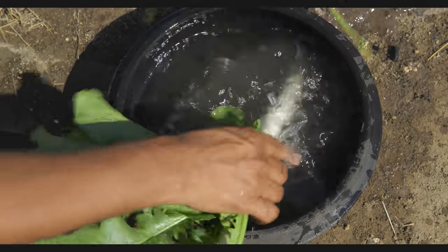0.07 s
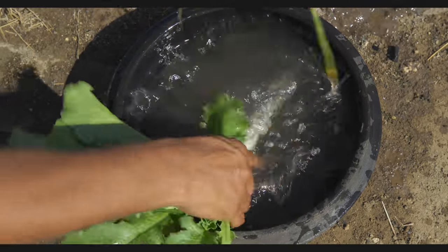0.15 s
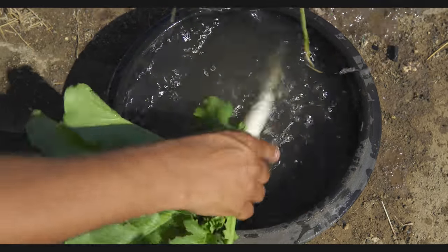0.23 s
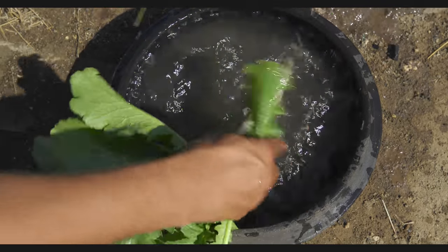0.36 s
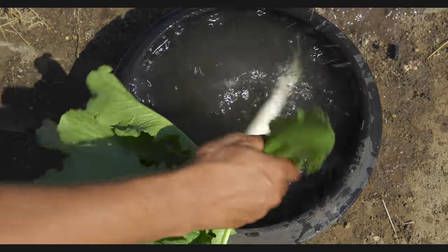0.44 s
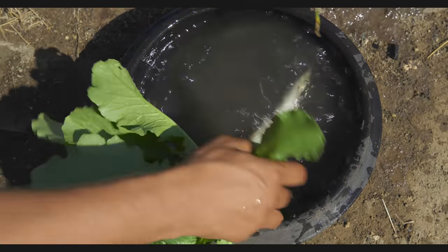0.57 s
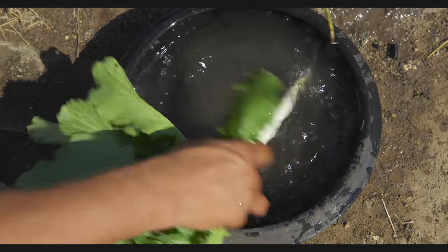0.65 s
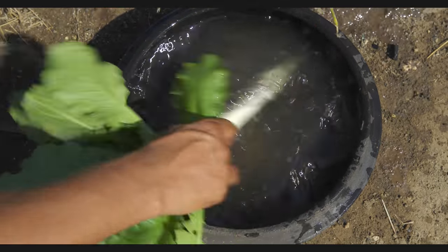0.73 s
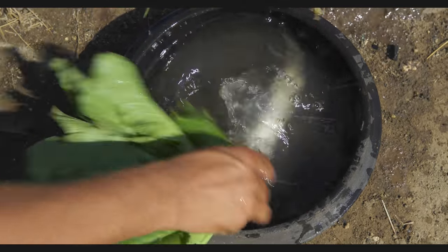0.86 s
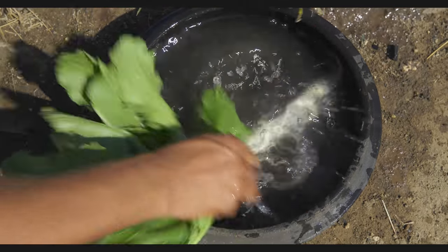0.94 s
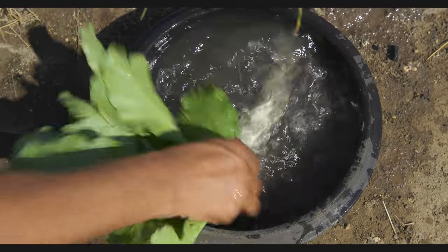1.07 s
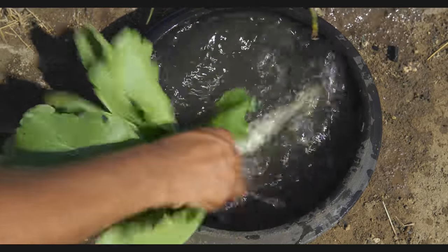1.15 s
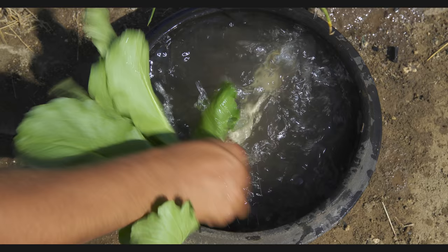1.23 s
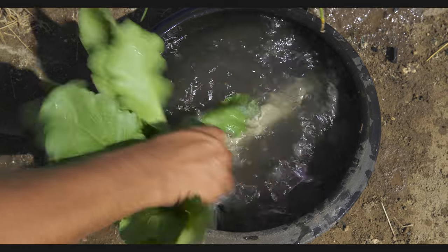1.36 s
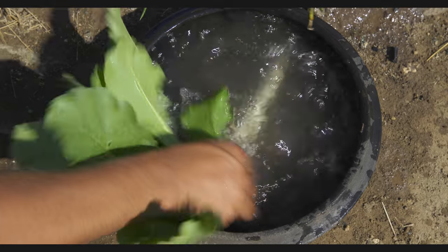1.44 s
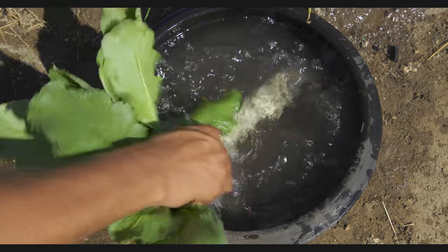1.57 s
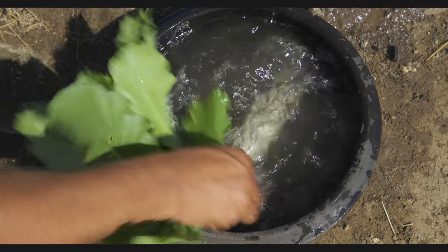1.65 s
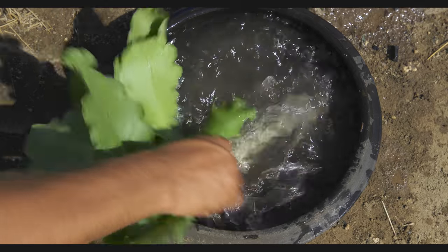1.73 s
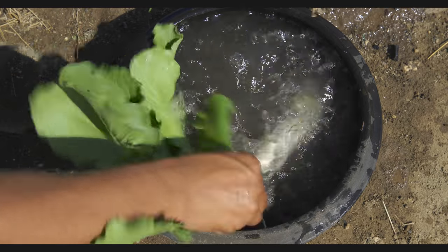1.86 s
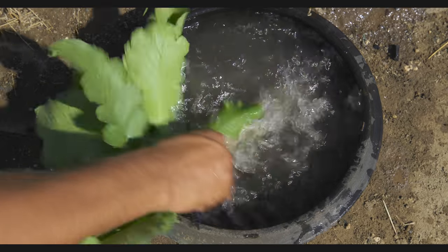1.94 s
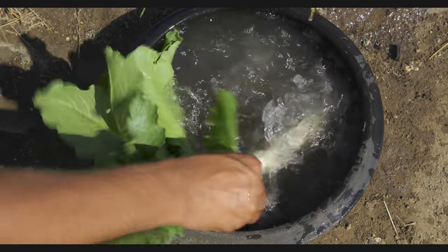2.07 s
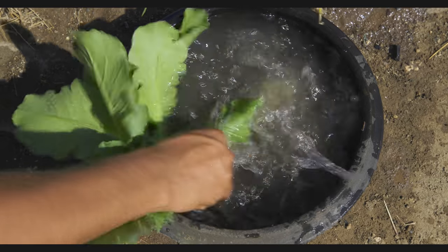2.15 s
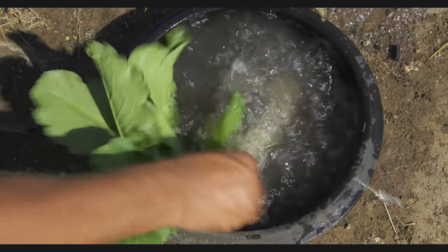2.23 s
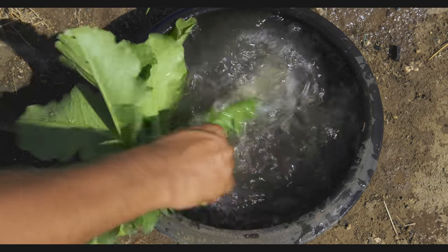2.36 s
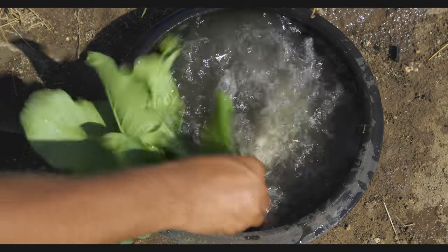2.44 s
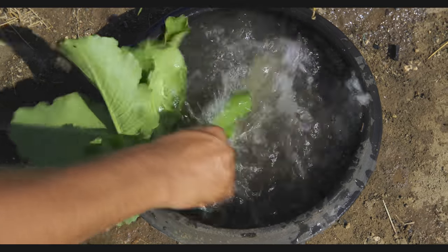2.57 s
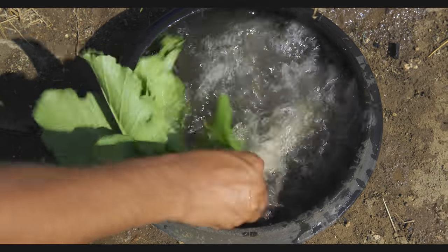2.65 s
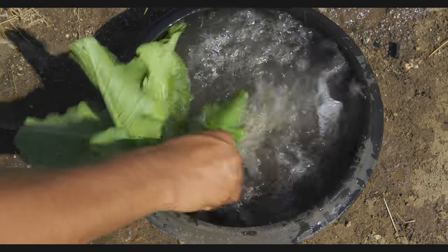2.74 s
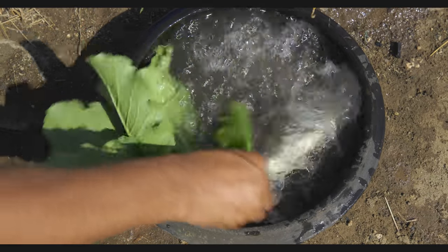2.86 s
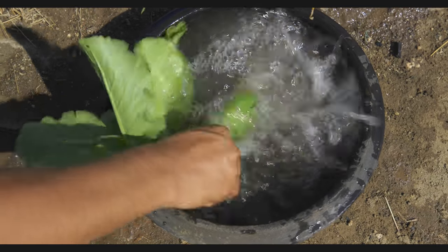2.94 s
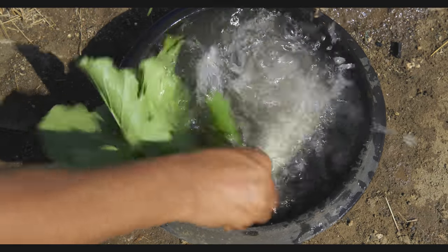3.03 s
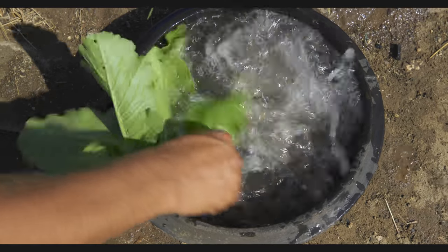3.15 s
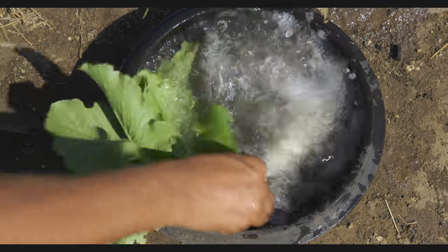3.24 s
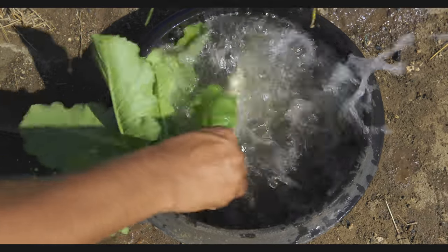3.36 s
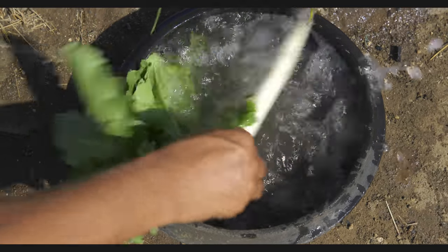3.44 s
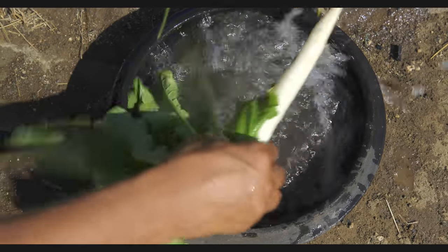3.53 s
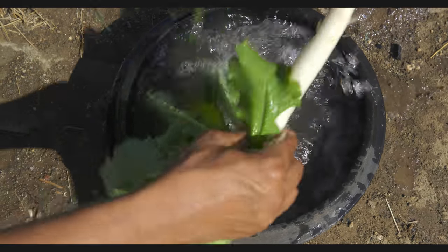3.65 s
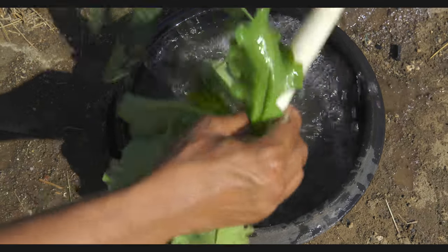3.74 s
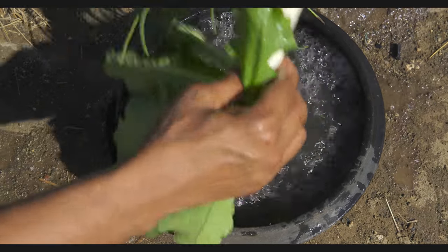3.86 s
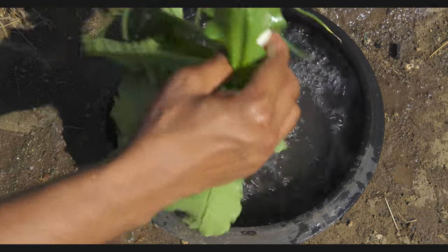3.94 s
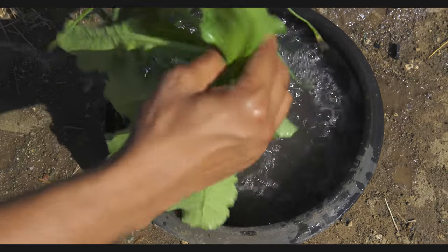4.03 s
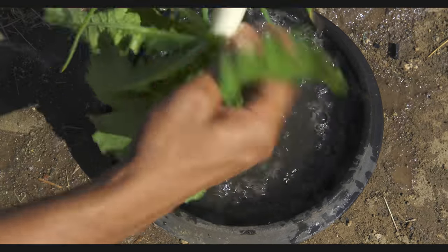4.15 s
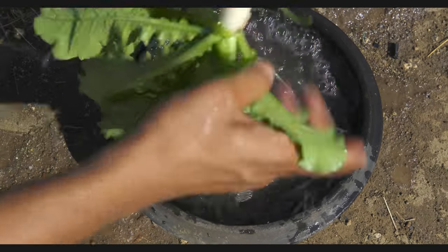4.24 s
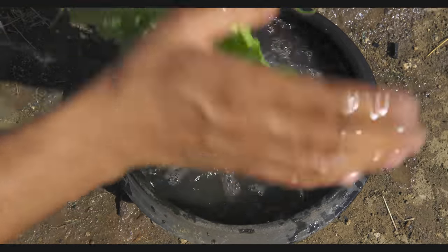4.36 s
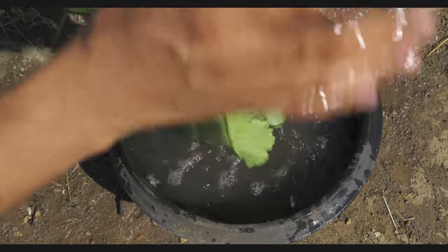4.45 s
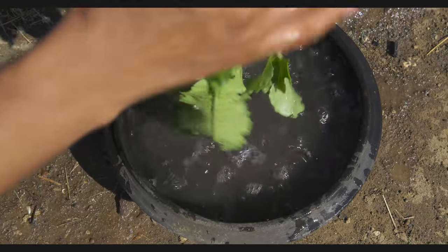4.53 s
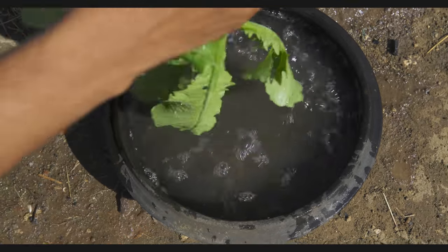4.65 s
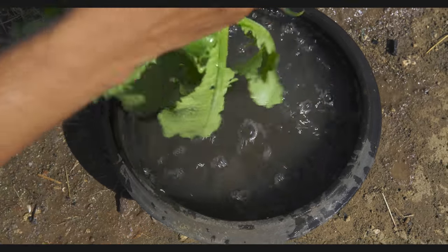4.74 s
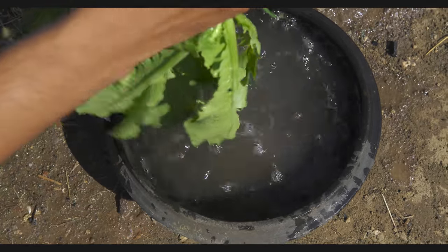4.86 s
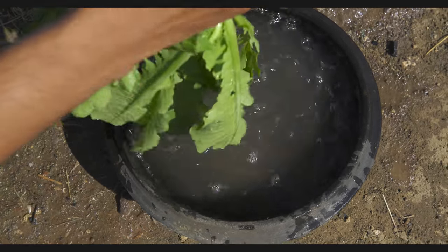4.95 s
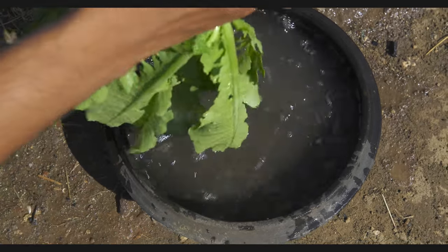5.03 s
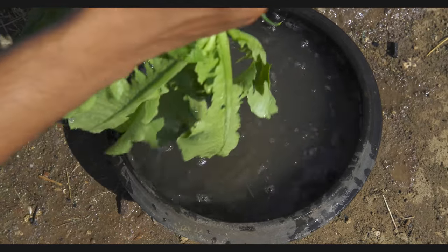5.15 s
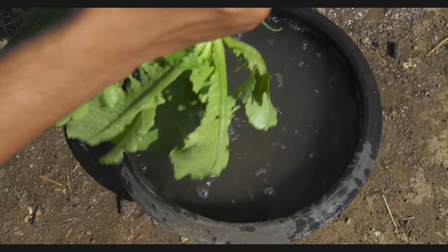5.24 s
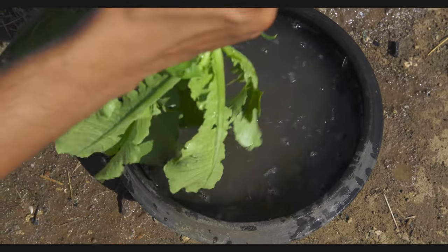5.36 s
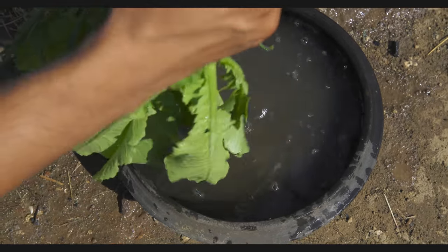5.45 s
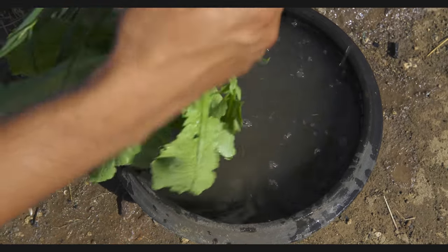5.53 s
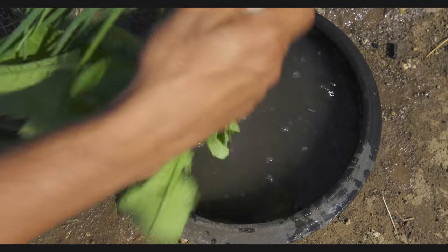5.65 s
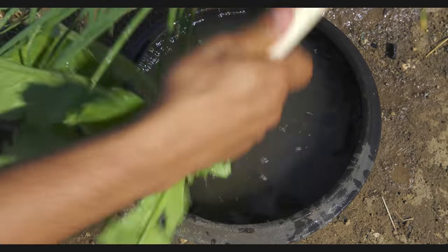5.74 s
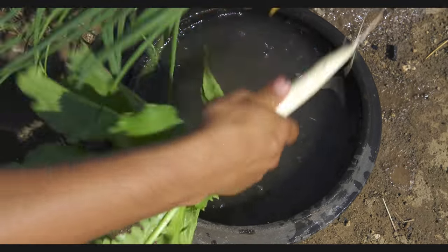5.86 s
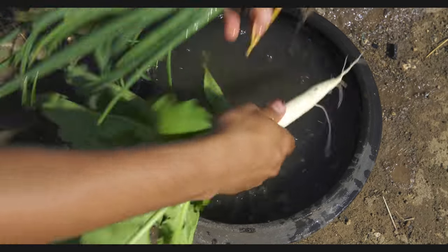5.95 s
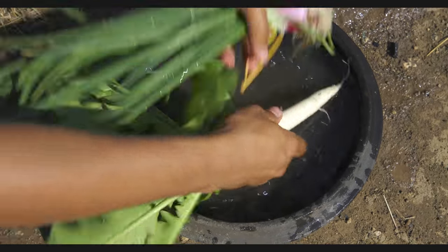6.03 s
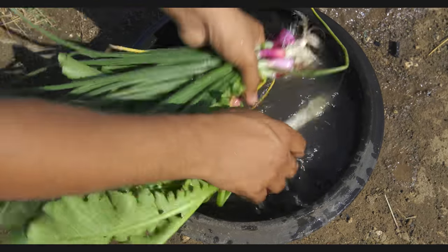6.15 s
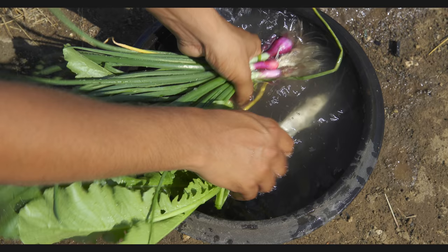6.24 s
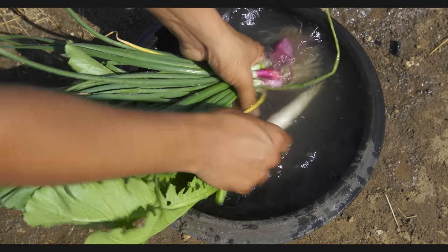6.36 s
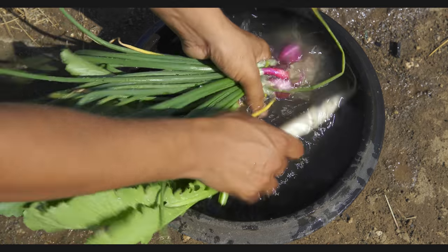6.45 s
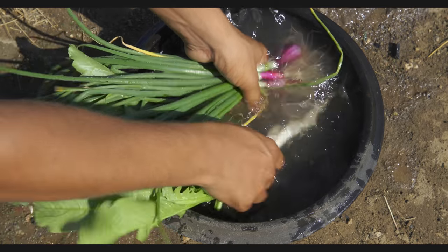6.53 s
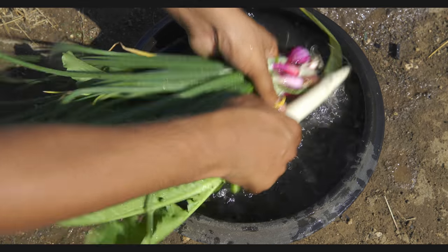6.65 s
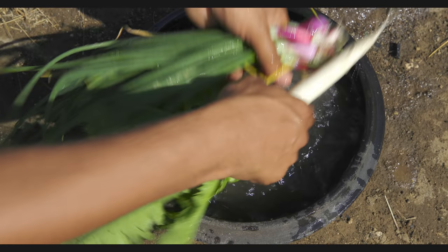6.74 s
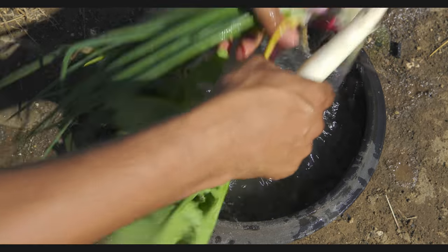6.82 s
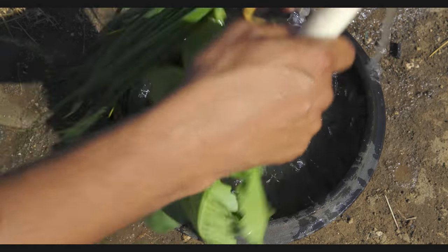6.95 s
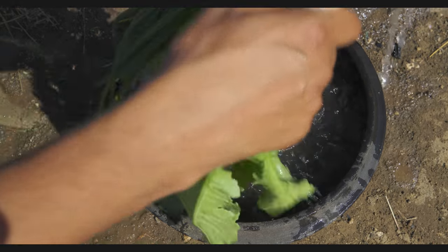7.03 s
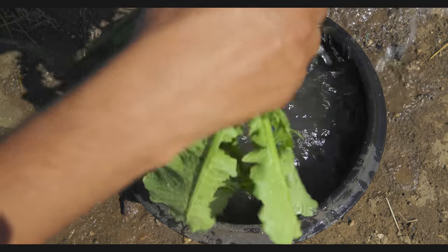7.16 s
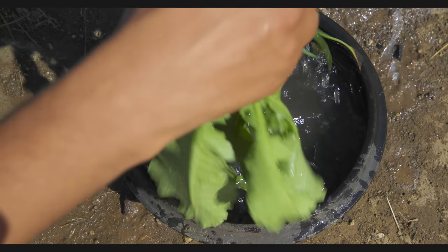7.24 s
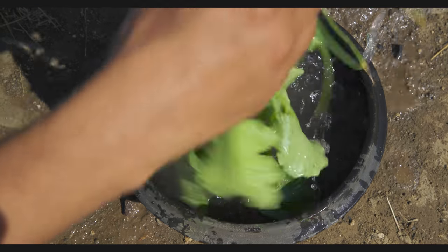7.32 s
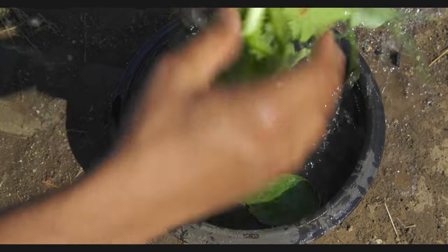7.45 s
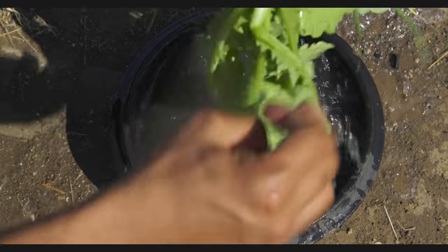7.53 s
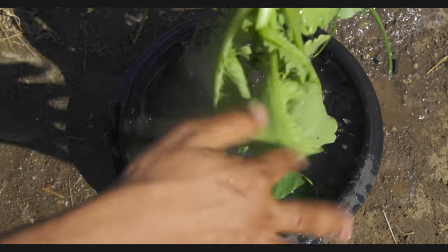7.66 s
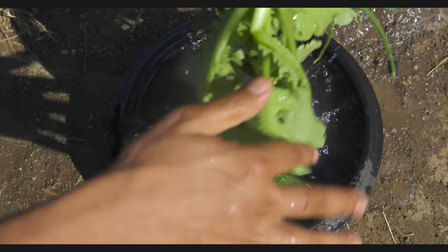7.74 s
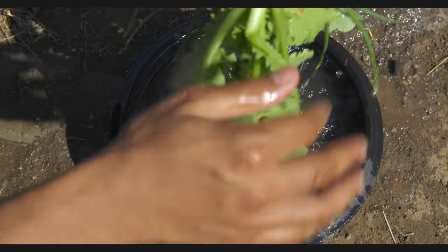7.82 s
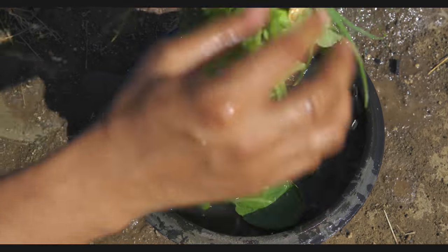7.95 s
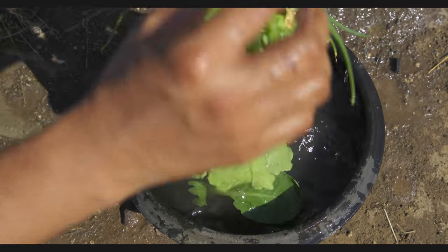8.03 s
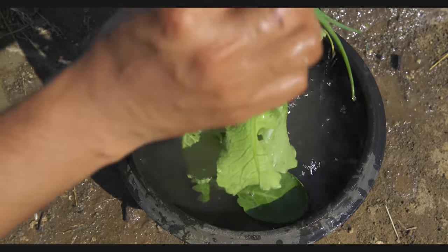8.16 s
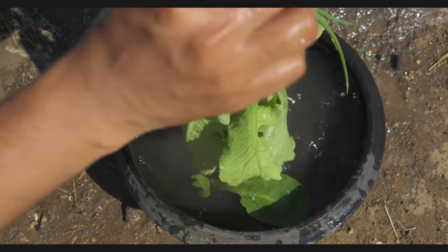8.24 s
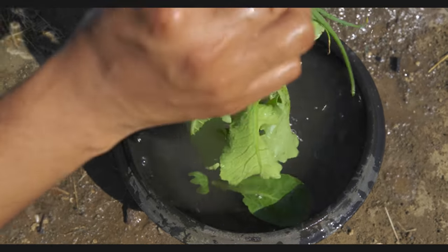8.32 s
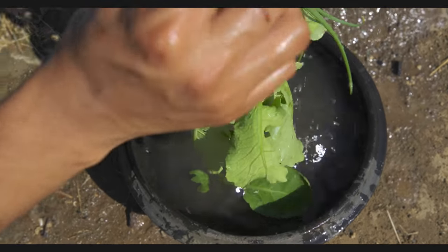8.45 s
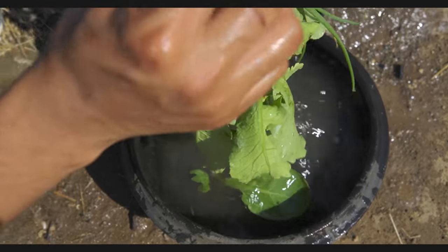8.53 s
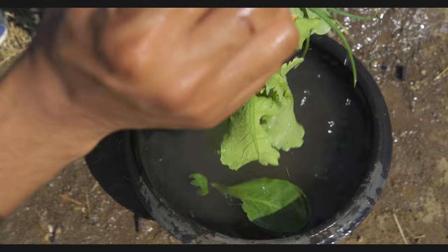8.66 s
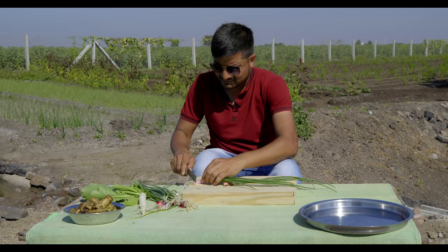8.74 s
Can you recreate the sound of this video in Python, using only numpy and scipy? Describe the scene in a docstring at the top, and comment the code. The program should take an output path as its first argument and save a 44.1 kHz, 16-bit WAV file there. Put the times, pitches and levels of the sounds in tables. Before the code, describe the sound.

Close, vigorous splashing and bubbly sloshing in a tub, a dripping pause with faint bird whistles, then lighter plinking dunks and drips.

```python
"""Washing vegetables in a tub

Radishes and spring onions are swished in a tub of water outdoors, lifted to drip, then dunked and lifted again.
Stirring folds air under: swarms of ringing bubbles over coloured noise gurgle, patter and crackle.
Larger bubbles and drops are single short tones; slaps and spits of spray are short bursts of noise.
A bird whistles far off in sliding tones, over the faint steady noise of the open field.
The loudest splashes overload the microphone, which rounds off their peaks."""
import sys
import numpy as np
from scipy import signal
from scipy.fft import rfft, irfft, next_fast_len
from scipy.io import wavfile
from scipy.ndimage import uniform_filter1d, map_coordinates

SR = 44100
rng = np.random.default_rng(int(sys.argv[2]) if len(sys.argv) > 2 else 0)


def pcm_store(signal):
    """Save signal as 16-bit PCM."""
    levels = np.round(np.clip(np.atleast_2d(signal), -1, 1) * 32767)
    wavfile.write(sys.argv[1], SR, levels.astype(np.int16).T)


N = 387631  # length in samples
TOP_HZ = 15850  # upper limit of the sound that is kept


def amp(db):
    """Turn decibels into a plain multiplier."""
    return 10 ** (np.asarray(db) / 20)


def unit(x):
    """Scale a sound to an average (rms) level of 1."""
    return x / np.sqrt(np.mean(x ** 2) + 1e-20)


def along(points, hz):
    """Read a curve of (Hz, value) points at any pitch, on a log pitch axis."""
    point_hz, value = np.transpose(points)
    return np.interp(np.log(hz + 1), np.log(point_hz + 1), value)


def wobble(rate):
    """A smooth random curve through a given number of random points a second."""
    points = rng.standard_normal(int(N * rate / SR) + 4)
    return map_coordinates(points, [np.arange(N) * rate / SR])


def add(track, start_s, sound):
    """Mix a sound into the track at its start time."""
    start = max(round(start_s * SR), 0)
    track[start:start + len(sound)] += sound[:max(len(track) - start, 0)]


def coloured(x, spectrum, size=4096):
    """Filter a sound to a given spectrum; the filter has energy 1 and never sounds ahead of its input."""
    hz = np.fft.rfftfreq(size, 1 / SR)
    cepstrum = irfft(np.log(amp(along(spectrum, hz))))
    # folding the second half onto the first puts the response at the earliest possible time
    cepstrum[1:size // 2] *= 2
    cepstrum[size // 2 + 1:] = 0
    response = irfft(np.exp(rfft(cepstrum)))
    response = response / np.linalg.norm(response)
    return signal.fftconvolve(x, response)[:len(x)]


def noise(spectrum):
    """Steady coloured noise of rms 1."""
    return unit(coloured(rng.standard_normal(N), spectrum))


def steady(x, span_s):
    """Even out a sound to about rms 1 over stretches of the given length."""
    size = int(span_s * SR)
    power = uniform_filter1d(uniform_filter1d(x ** 2, size), size)
    return x / np.sqrt(np.abs(power) + 1e-9)


def sweep(length_s, start_hz, end_hz, bend):
    """A tone that swells and fades while its pitch slides; the higher the bend, the later the slide."""
    u = np.linspace(0, 1, int(length_s * SR))
    hz = start_hz + (end_hz - start_hz) * u ** bend
    loudness = np.sqrt(np.abs(np.sin(np.pi * u)))
    return loudness * np.sin(2 * np.pi * np.cumsum(hz) / SR)


def ring(t, hz, t60, glide, linger=0):
    """A bubble: a tone that swells within a few cycles, fades and glides up in octaves until it bursts."""
    life = np.minimum(t / (0.49 * t60), 1)  # 1 is the burst, just before half of the 60 dB fade time t60
    attack = 1 - np.exp(-t / (0.64 / hz + 0.00016))
    fade = np.hypot(amp(-60 * t / t60), linger)  # linger is a share that does not fade
    loudness = attack * fade * (1 - life ** 8)
    loudness = loudness / loudness.max(axis=-1, keepdims=True)
    pitch_hz = hz * 2 ** (np.clip(glide, 0, 2) * life ** 2)
    return loudness * np.sin(2 * np.pi * np.cumsum(pitch_hz, axis=-1) / SR)


# Colour of the open air: pitch_hz, level_db
FIELD_COLOUR = [(20, -24.5), (45, -4.5), (85, -1), (330, -2), (600, -10), (1100, -23.5), (7000, -18.5),
                (16000, -18.5)]


def field():
    """The quiet open field, a faint steady noise."""
    return amp(-49.5) * noise(FIELD_COLOUR)


# Distant bird whistles: start_s, length_s, start_pitch_hz, end_pitch_hz, peak_level_db
WHISTLES = [(4.28, 0.075, 2830, 2860, -46.5), (4.55, .07, 2400, 2020, -59), (4.915, 0.09, 2820, 2900, -51),
            (5.185, 0.061, 2390, 2050, -57), (8.33, 0.44, 1200, 1050, -52.5)]


def bird():
    """Thin whistles from far away, which do most of their sliding near the end."""
    out = np.zeros(N)
    for start_s, length_s, start_hz, end_hz, level_db in WHISTLES:
        add(out, start_s, amp(level_db) * sweep(length_s, start_hz, end_hz, bend=2.8))
    return out


# How long the tub and soil scatter sound: pitch_hz, t60_s (time to fade by 60 dB)
SCATTER_FADE = [(200, 0.16), (2000, 0.095), (12000, 0.024)]


def scatter(x):
    """The short answer of the tub and the ground: fading noise, with high pitches fading soonest."""
    hz, t, grains = signal.stft(rng.standard_normal(SR // 4), SR, nperseg=256)
    fade = amp(-60 * t / along(SCATTER_FADE, hz)[:, None])
    tail = signal.istft(grains * fade, SR, nperseg=256)[1]
    delayed = np.pad(tail / np.linalg.norm(tail), (SR // 300, 0))  # starts 1/300 s late
    return signal.fftconvolve(x, delayed)[:N]


# Sharp spits of spray as a film of water tears: start_s, peak_level_db
SPITS = [(.036, 5.5), (0.177, 0), (1.01, -1), (1.213, -1.5), (1.868, -8), (2.279, -12), (2.459, -4.5),
         (2.683, -1), (2.834, -3), (2.868, -4.5), (2.978, -2), (3.391, -0.5), (3.448, -4), (3.566, -9),
         (6.092, -3.5), (7.165, -4.5), (7.322, -2.5), (7.542, 0.5), (8.735, -13.5)]


def spits():
    """The strongest bursts of spray: bright cracks of fading noise with no ring."""
    out, t = np.zeros(N), np.arange(SR // 40) / SR
    for start_s, level_db in SPITS:
        burst = rng.standard_normal(len(t)) * amp(-60 * t / 0.013)
        crack = coloured(burst, SPRAY_COLOUR) + amp(-9) * coloured(burst, PATTER_COLOUR)
        add(out, start_s, amp(level_db) * crack / np.abs(crack).max())
    return out


# Drops striking the surface: start_s, pitch_hz, plip_peak_level_db
DROPS = [(0.061, 4800, -4.5), (.125, 3090, -5), (.164, 1076, -7.5), (.297, 7460, -9), (0.946, 663, -11.5),
         (.967, 730, -12.5), (1.268, 810, -10.5), (1.359, 750, -14), (1.69, 543, -12.5), (2.092, 1070, -7),
         (2.245, 710, -9), (2.812, 650, -4.5), (2.995, 1000, -9.5), (3.364, 880, -5), (3.913, 5530, -22),
         (4.328, 4190, -15.5), (4.335, 3520, -25.5), (4.361, 8600, -21), (4.424, 653, -21),
         (4.424, 3320, -7), (4.425, 2290, -19), (4.439, 4100, -14), (4.522, 9600, -16.5),
         (4.706, 1630, -31.5), (4.88, 6200, -22.5), (5.159, 4005, -22.5), (5.204, 6560, -17.5),
         (5.816, 9100, -16.5), (5.965, 594, -22.5), (6.535, 3420, -10), (6.565, 1940, -11.5),
         (6.585, 2070, -1), (6.588, 3470, -4.5), (6.611, 4120, -10), (7.041, 2620, -10.5),
         (7.108, 6800, -7), (7.163, 1920, -13.5), (7.178, 2900, -16.5), (7.21, 2390, -10),
         (7.222, 2300, -11), (7.236, 2370, -9.5), (7.24, 5220, -3.5), (7.415, 4270, -9.5),
         (7.441, 4940, -3), (7.478, 8440, -10), (7.532, 3550, -8.5), (7.537, 1870, -6.5),
         (7.554, 2270, -4.5), (7.608, 3670, -15), (7.682, 9600, -8.5), (7.926, 3840, -9),
         (8.125, 8000, -13.5), (8.242, 6440, -14), (8.307, 12450, -20), (8.38, 3330, -17.5),
         (8.405, 2020, -25.5), (8.479, 7300, -13), (8.546, 6760, -24.5), (8.735, 6670, -10.5)]


def drips():
    """A drop ticks on the surface and traps a shallow bubble; small, high-pitched ones die soonest."""
    out, t = np.zeros(N), np.arange(SR // 40) / SR
    for start_s, hz, level_db in DROPS:
        tick = coloured(rng.standard_normal(len(t)) * amp(-60 * t / 0.026), SPRAY_COLOUR)
        plip = ring(t, hz, t60=0.019 * (hz / 2000) ** -0.3, glide=0.036)
        tick_db = min(level_db / 2 - 10, -10.5)  # gentle drops hardly spit
        add(out, start_s, amp(level_db) * (plip + amp(tick_db) * tick))
    return out


# Crests slapping the surface: start_s, level_db (before a shared 11.5 dB cut), splash_centre_hz
SLAPS = [(0.163, -13.5, 2200), (1.009, -16, 3000), (1.055, -13.5, 1270), (1.69, -18, 1210),
         (2.025, -7, 1130), (2.034, -8, 1030), (2.424, -10, 1800), (2.632, -11, 3150), (2.804, -13, 3600),
         (2.818, -9, 2250), (3.115, -10.5, 560), (4.425, -18, 4600), (6.351, -18, 2640),
         (6.522, -16.5, 4160), (7.211, -13, 7050), (7.554, -11, 4100), (7.719, -22.5, 2680)]
SLAP_SKIRT_DB = 2.5  # loss one octave from the centre; it grows with the square of the distance


def slaps():
    """Water hits water: a thud, a smack and a spit, each a crack with a brief cluster of trapped bubbles."""
    out, t = np.zeros(N), np.arange(SR // 12) / SR
    bands = [(GURGLE_COLOUR, 800), (PATTER_COLOUR, 2700), (SPRAY_COLOUR, 7000)]
    for start_s, level_db, splash_hz in SLAPS:
        for spectrum, centre_hz in bands:
            octaves = np.log2(centre_hz / splash_hz)
            band_db = level_db - SLAP_SKIRT_DB * octaves ** 2 - 11.5
            # a very short snap, then a weaker and longer wash
            fade = amp(-60 * t / 0.006) + amp(-15) * amp(-60 * t / 0.054)
            crack = rng.standard_normal(len(t)) * fade
            cluster = np.zeros(len(t))
            for size, delay in rng.random((6, 2)):
                hz = centre_hz * 2 ** (0.733 * (2 * size - 1))
                bubble = ring(t, hz, t60=0.02 * (hz / 2000) ** -0.4, glide=0)
                add(cluster, 0.0055 * delay ** 2, bubble)
            wet = unit(coloured(crack, spectrum)) + unit(coloured(cluster, spectrum))
            add(out, start_s, amp(band_db) * unit(wet))
    return out


# Large air pockets that ring as they rise and burst:
# start_s, pitch_hz, peak_level_db, t60_s (time to fade by 60 dB), upward_glide_octaves (played up to 2)
BUBBLES = [(.251, 2080, -15.5, 0.033, 2.2), (1.105, 613, -21.5, 0.16, 0.11),
           (2.631, 309, -15.5, 0.057, 0.17), (2.812, 290, -14.5, 0.062, 0.99),
           (2.995, 452, -15.5, 0.062, 0.17), (3.215, 847, -11, 0.067, 0), (3.266, 323, -20.5, 0.055, 0.17),
           (3.49, 316, -27.5, .1, 0.054), (3.978, 874, -22, 0.037, 0.6), (6.064, 1020, -12.5, 0.03, 0.088),
           (6.22, 927, -7.5, 0.032, 0), (6.631, 880, -16.5, 0.073, 0.47), (6.633, 1630, -14, 0.043, 0.1),
           (6.659, 834, -16.5, 0.037, 0.38), (6.968, 833, -7, 0.055, 0.042),
           (6.979, 1520, -17, 0.036, 0.12), (6.99, 813, -7, 0.071, 0.11), (6.997, 1900, -10.5, 0.025, 0.22),
           (7.05, 609, -8.5, 0.1, 0.069), (7.083, 1383, -13, 0.059, 0.6), (7.106, 1250, -28, 0.04, 1.3),
           (7.232, 628, -16, 0.106, 0.44), (7.249, 1940, -12, 0.018, 0.52),
           (7.743, 1950, -14.5, 0.037, 0.49), (8.048, 1345, -37.5, .065, 0.26),
           (8.107, 563, -30, .195, 2.3), (8.392, 1360, -33, 0.035, .9)]
LINGER_DB = -17.5  # a large pocket keeps singing about this far under its peak until it bursts


def plinks():
    """The larger air pockets, each heard on its own as a ringing bubble."""
    out = np.zeros(N)
    for start_s, hz, level_db, t60, glide in BUBBLES:
        t = np.arange(int(t60 * SR)) / SR
        add(out, start_s, amp(level_db) * ring(t, hz, t60, glide, amp(LINGER_DB)))
    return out


# Cavities dragged under by the hardest strokes:
# start_s, length_s, start_pitch_hz, end_pitch_hz, peak_level_db (before the flutter)
GLOOPS = [(3.02, 0.045, 225, 175, -29), (3.1, 0.079, 135, 490, -24), (3.204, 0.034, 350, 180, -24.5),
          (3.284, .07, 155, 303, -26.5), (3.389, 0.052, 221, 161, -30.5)]


def gloops():
    """The cavity behind the plunging root sings low, sliding as it changes size; its walls flutter."""
    out = np.zeros(N)
    for start_s, length_s, start_hz, end_hz, level_db in GLOOPS:
        add(out, start_s, amp(level_db) * sweep(length_s, start_hz, end_hz, bend=1))
    return out * amp(2 * wobble(120))


# Strokes of the vegetables through the water; deep ones gurgle, shallow dunks hardly do:
# start_s, hold_s, level_db (before the mix trims in stirring), gurgle_db (relative to that level)
STROKES = [(0.024, 0.039, -19, -2.5), (0.12, 0.11, -20.5, -4), (0.938, 0.18, -26.5, -0.5),
           (1.18, 0.054, -27, -3), (1.326, 0.072, -23, -0.5), (1.483, 0.14, -26.5, 1),
           (1.673, 0.11, -26, 1.5), (1.821, 0.24, -24.5, -0.5), (2.006, 0.12, -25.5, 4),
           (2.16, 0.23, -26, 0.5), (2.427, 0.21, -22.5, 2), (2.726, 0.082, -21.5, 3),
           (2.929, 0.087, -20.5, 1.5), (3.103, 0.1, -19.5, 2.5), (3.288, 0.12, -19, 2),
           (3.485, 0.02, -25, -0.5), (6.028, 0.044, -29, -2.5), (6.231, 0.038, -24, -9.5),
           (6.318, 0.022, -26, -12), (6.535, 0.09, -24, -13.5), (6.729, 0.19, -21.5, -10),
           (6.955, 0.12, -22.5, -4.5), (7.216, 0.014, -26.5, -10)]
RISE_DB_PER_S, FALL_DB_PER_S = 382, 159  # how a stroke swells and dies
FOAM_DB, FOAM_S = -6.5, 0.15  # fizz left behind by the strokes, and its lifetime
# Water trickling off the lifted leaves: time_s, level_db (before the mix trims in stirring)
TRICKLE = [(.5, -46), (.82, -32.5), (3.6, -36), (4.05, -52), (4.3, -45), (4.45, -36.5), (4.7, -47.5),
           (5.62, -52), (5.75, -42), (5.9, -39), (6.1, -29), (6.9, -34), (7.5, -28.5), (7.85, -35),
           (8.2, -42.5), (8.73, -41.5)]
FINE_GURGLE_DB, FINE_PATTER_DB = -16, -7  # foam and trickle hold few of the larger bubbles
STOP_S = 8.745  # the water sound stops here at once


def agitation():
    """Levels in dB of gurgle, patter and spray: strokes swell, hold and die; foam and trickle fizz."""
    t = np.arange(N) / SR
    churn, deep = np.zeros(N), np.zeros(N)  # powers
    for start_s, hold_s, level_db, gurgle_db in STROKES:
        rise_db = RISE_DB_PER_S * np.maximum(start_s - t, 0)
        fall_db = FALL_DB_PER_S * np.maximum(t - start_s - hold_s, 0)
        power = amp(level_db - rise_db - fall_db) ** 2
        churn += power
        deep += power * amp(gurgle_db) ** 2
    leak = 1 / (FOAM_S * SR)
    foam = amp(FOAM_DB) ** 2 * signal.lfilter([leak], [1, leak - 1], churn)  # builds up and drains
    trickle = amp(np.interp(t, *np.transpose(TRICKLE))) ** 2
    fine = foam + trickle
    gurgle = deep + amp(FINE_GURGLE_DB) ** 2 * fine
    patter = churn + amp(FINE_PATTER_DB) ** 2 * fine
    spray = churn + fine
    powers = np.array([gurgle, patter, spray])
    return 10 * np.log10(powers * (t < STOP_S) + 1e-9)


def swarm(rate, centre_hz, spread, cycles, size_db, glide):
    """Random bubbles, rate a second, many faint and a few strong; higher ones ring for a shorter time."""
    draws = np.clip(rng.random((int(rate * N / SR), 5)), 1e-4, 1 - 1e-4)
    moment, pitch, life, size, rise = draws.T[:, :, None]
    hz = np.minimum(centre_hz * 2 ** (spread * (2 * pitch - 1)), TOP_HZ)  # spread in octaves
    t60 = cycles / hz * 2 * 10 ** -life  # from dull ticks to clear pings
    k = np.arange(int(2 * cycles / centre_hz * SR))
    loudness = amp(size_db * np.minimum(-np.log(size), 4.2))
    sounds = loudness * ring(k / SR, hz, t60, glide * rise)
    places = (moment * N).astype(int) + k
    return unit(np.bincount(places.ravel(), sounds.ravel(), N)[:N])


def froth(bubbles, spectrum, bubble_db, surge_db):
    """Bubbles standing out of a wash of noise, surging quickly around a steady level."""
    mix = amp(bubble_db) * steady(coloured(bubbles, spectrum), 0.12) + noise(spectrum)
    return steady(mix * amp(surge_db), 0.065)


# Colours of the four bubble sizes, largest to smallest: pitch_hz, level_db
# (slaps, drips and spits borrow some of them)
GULP_COLOUR = [(80, -40.5), (170, -8.5), (250, -5.5), (330, 4), (480, 5), (700, -25), (1500, -73)]
GURGLE_COLOUR = [(60, -63), (330, -19), (610, -6.5), (880, -0.5), (1120, -3.5), (1450, -10), (2200, -13.5),
                 (5000, -73)]
PATTER_COLOUR = [(100, -37.5), (1100, -10), (1800, -8.5), (2330, 0.5), (2900, -4.5), (3800, 0), (5200, -5),
                 (9000, -51)]
SPRAY_COLOUR = [(150, -34), (1500, -21), (3600, -22), (4900, -5), (6500, -2), (8500, -4), (11500, -8),
                (15700, -18)]


def stirring():
    """Each wavelet releases crackle and bubbles of all sizes at once; deep strokes gulp the most."""
    gurgle_db, patter_db, spray_db = agitation()
    wavelets = 0.79 * wobble(55) + 0.69 * wobble(190)
    vigour = np.clip((spray_db + 49.0) / 22, 0, 1)
    # shallow dunks surge and crackle less, and plink more
    shallow = vigour * np.clip((patter_db - gurgle_db) / 12, 0, 1)
    surge = vigour * (1 - shallow / 2) * wavelets
    calm_db = -15 * (1 - vigour)  # settling water hisses more evenly
    # bursting bubbles crackle
    ticks = swarm(rate=350, centre_hz=5110, spread=0.97, cycles=22, size_db=5.0, glide=0)
    ticks = (1 - shallow / 2) * ticks

    big = swarm(rate=190, centre_hz=818.5, spread=0.741, cycles=24.7, size_db=3.5, glide=0.31)
    gurgle = froth(big, GURGLE_COLOUR, bubble_db=5.5 + calm_db, surge_db=2.0 * surge)

    small = swarm(rate=560, centre_hz=2708, spread=0.95, cycles=57, size_db=3.6, glide=0.5)
    patter = froth(ticks + small, PATTER_COLOUR, bubble_db=6.0 + shallow + calm_db, surge_db=2.4 * surge)

    tiny = swarm(rate=1300, centre_hz=7780, spread=0.97, cycles=103, size_db=4.0, glide=0.048)
    spray = froth(ticks + tiny, SPRAY_COLOUR, bubble_db=4.0 + calm_db, surge_db=3.6 * surge)

    huge = swarm(rate=60, centre_hz=360, spread=0.74, cycles=24, size_db=5.0, glide=0.43)
    gulps = froth(huge, GULP_COLOUR, bubble_db=2.5, surge_db=4.6 * surge)
    gulp_db = gurgle_db - 18.0 + 0.63 * (gurgle_db - patter_db)  # the deeper the stroke, the more it gulps

    large = amp(gulp_db) * gulps + amp(gurgle_db - 0.35) * gurgle
    fine = amp(patter_db - 2.0) * patter + amp(spray_db - 2.5) * spray
    return large + fine


def scene():
    """The water with its scattered answer, over the bird and the field, on one channel."""
    water = spits() + drips() + slaps() + plinks() + gloops() + stirring()
    mix = field() + bird() + amp(-17.0) * scatter(water) + water
    return mix[None]


def record(dry):
    """The microphone rounds off peaks at full scale, then everything from TOP_HZ up is removed."""
    rounded = dry / (1 + np.abs(dry) ** 8) ** (1 / 8)
    size = next_fast_len(N + SR // 2)
    kept = np.fft.rfftfreq(size, 1 / SR) < TOP_HZ
    return irfft(rfft(rounded, size) * kept, size)[..., :N]


dry = scene()
out = record(dry)
pcm_store(out)
```